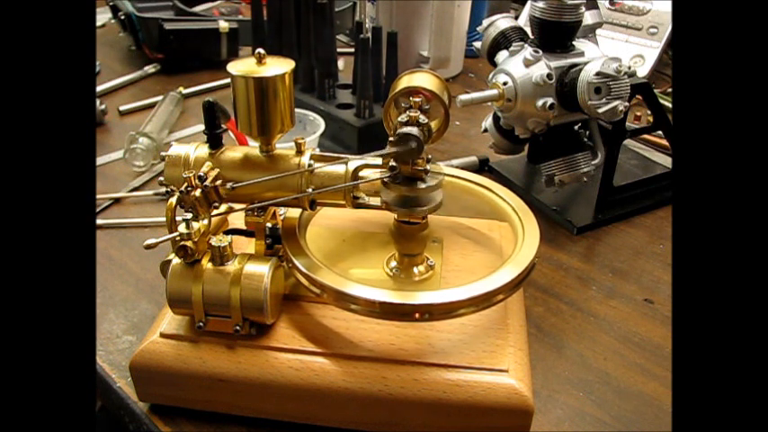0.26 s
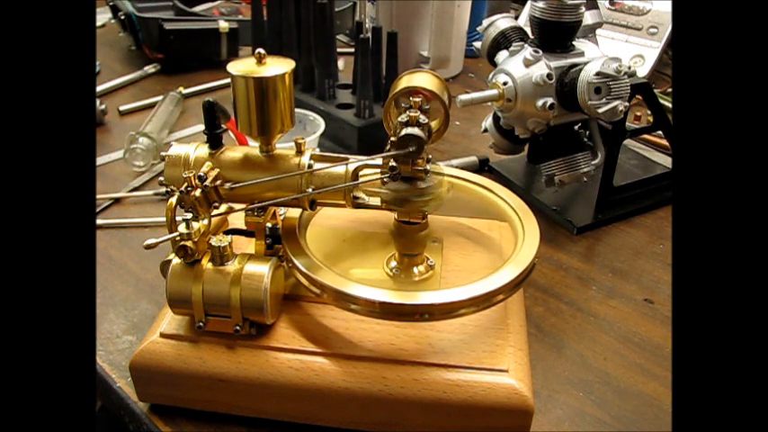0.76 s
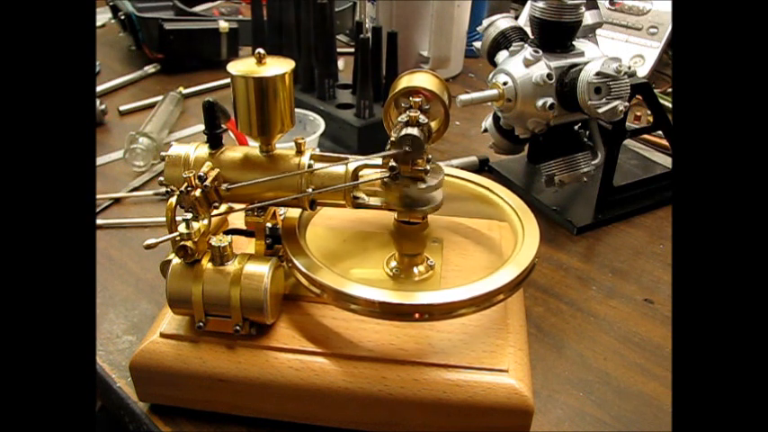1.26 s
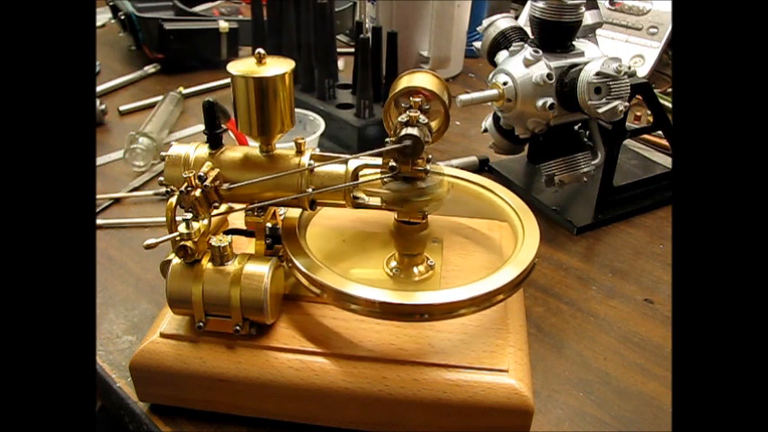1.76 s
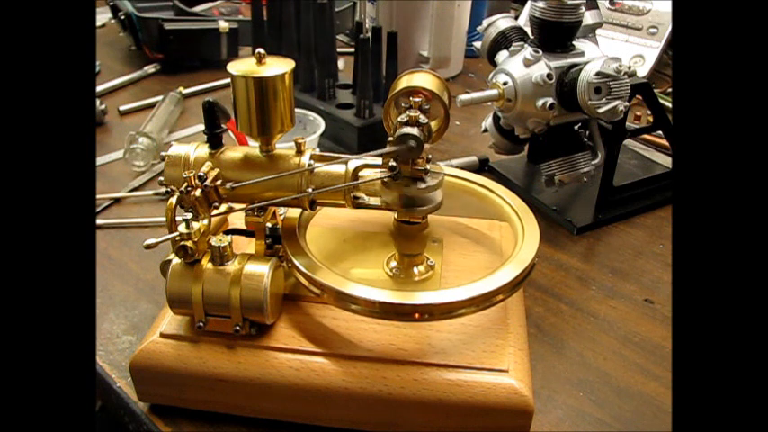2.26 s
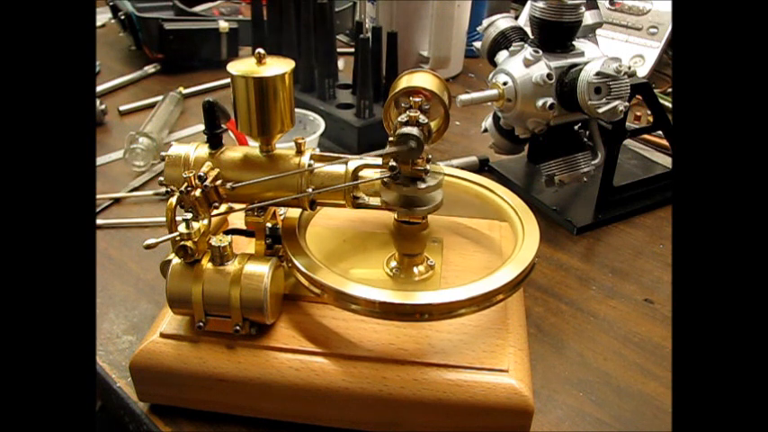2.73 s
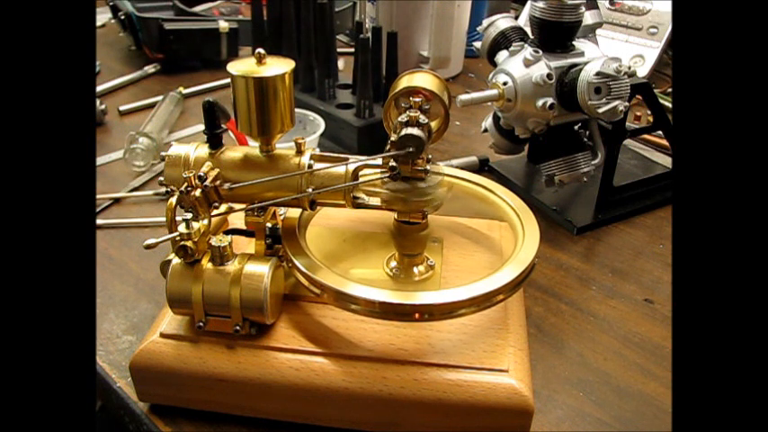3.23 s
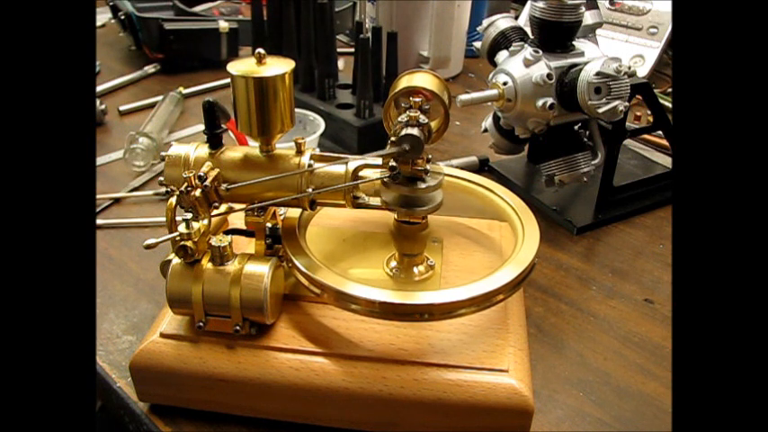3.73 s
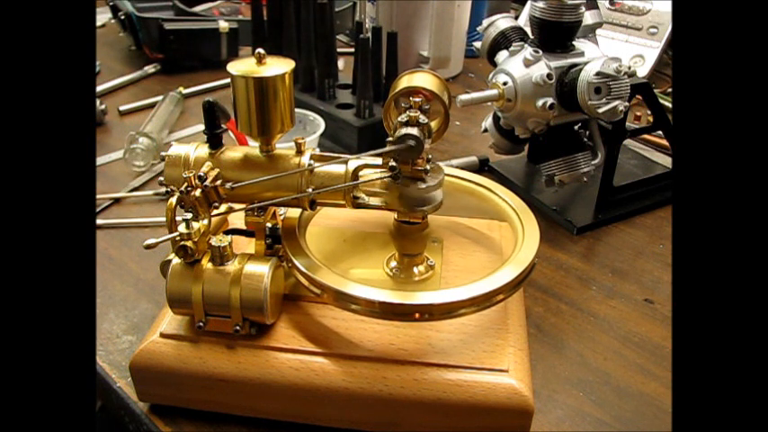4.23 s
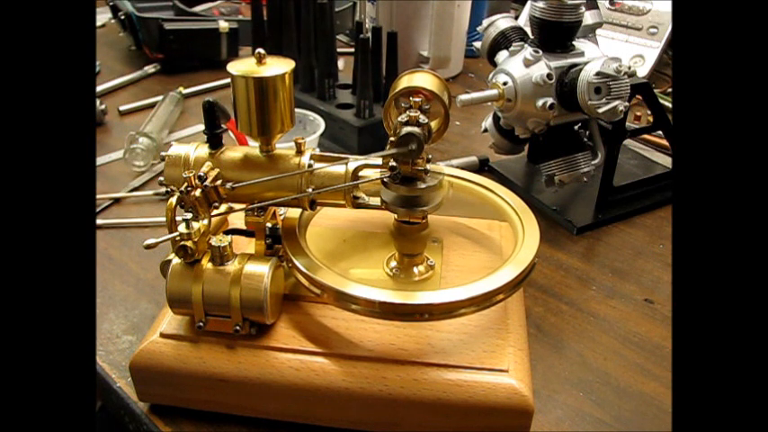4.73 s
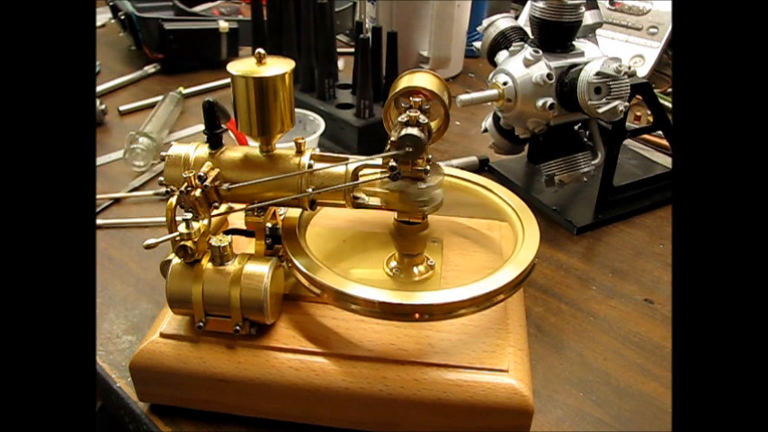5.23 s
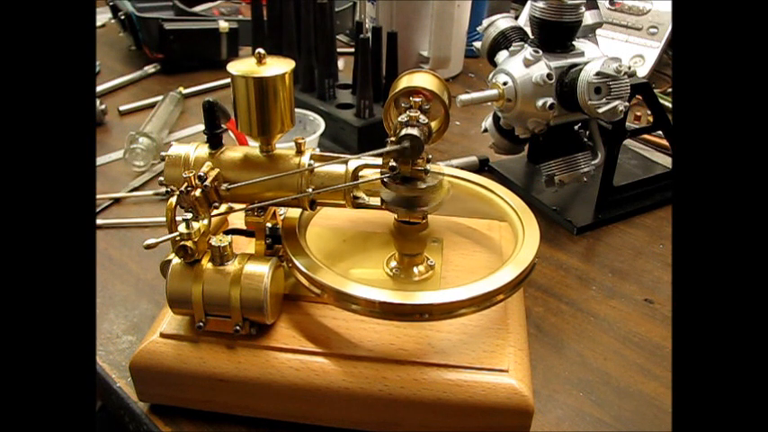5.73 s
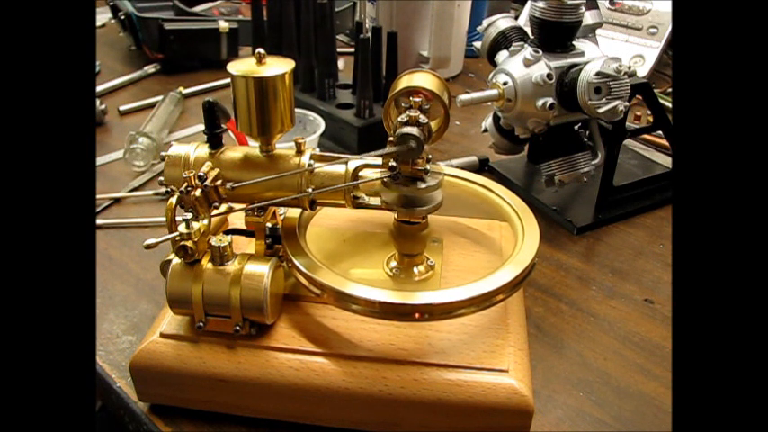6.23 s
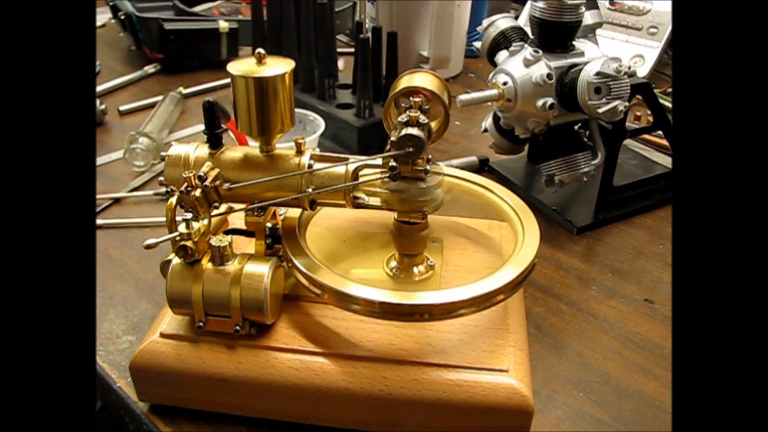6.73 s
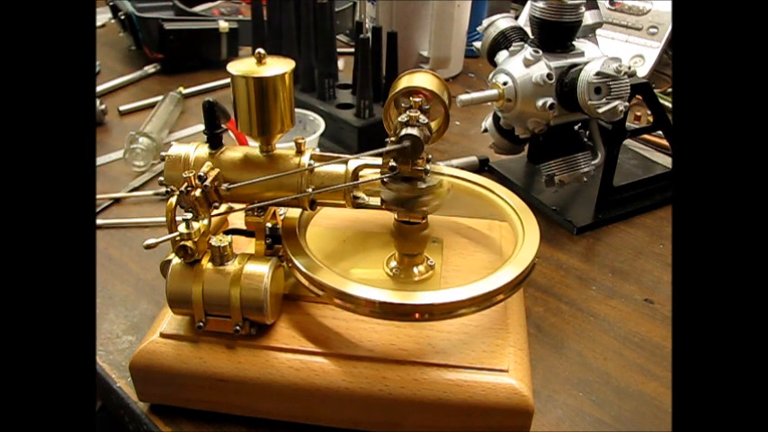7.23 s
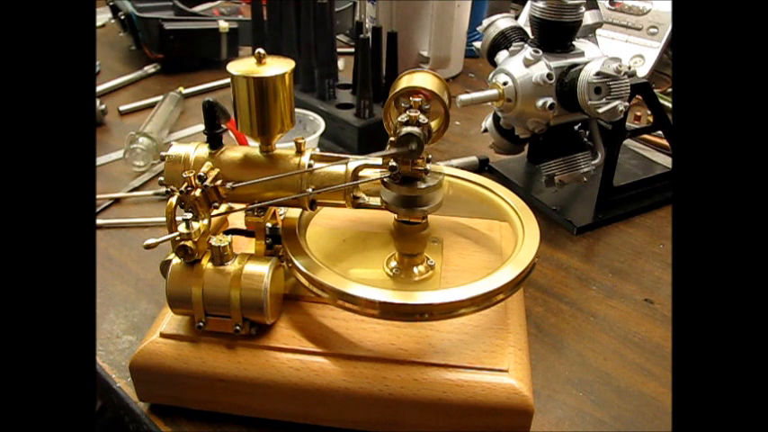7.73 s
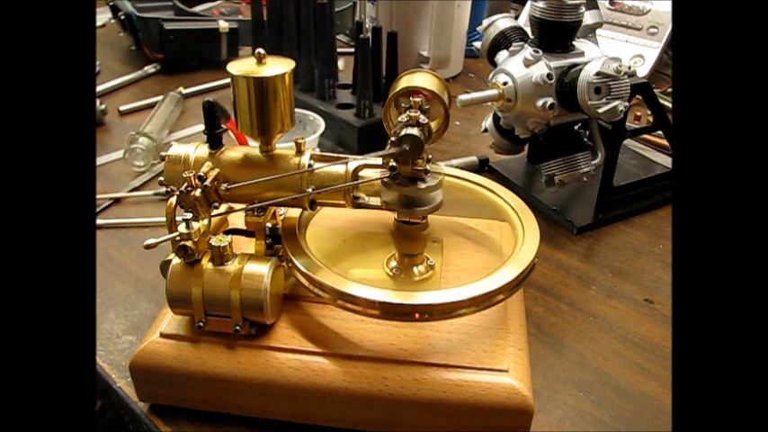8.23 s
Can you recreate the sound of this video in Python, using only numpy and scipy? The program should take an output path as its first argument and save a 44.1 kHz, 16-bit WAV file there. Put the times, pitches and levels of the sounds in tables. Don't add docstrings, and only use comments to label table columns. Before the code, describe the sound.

Close up on a bench, a model brass engine fires with sharp snapping pops, roughly two to three a second, slightly irregular. After each bang the flywheel coasts through one or two much weaker puffs while metal clicks, gears chatter and air hisses in. Early firing is quicker; later gaps lengthen. The shop adds short reflections and a little room ring; no other activity.

```python
import sys
import numpy as np
from scipy import signal
from scipy.fft import rfft, irfft, next_fast_len
from scipy.io import wavfile

SR = 44100
rng = np.random.default_rng(int(sys.argv[2]) if len(sys.argv) > 2 else 0)


def rack_gain(trim_db):
    fader = np.asarray(trim_db, float)
    return 10 ** (fader / 20)


def inscribe(sig):
    pcm = np.round(np.clip(np.atleast_2d(sig).T, -1, 1) * 32767)
    wavfile.write(sys.argv[1], SR, pcm.astype(np.int16))


N = 373968
CYCLE_S = .15

# t/s, thump level/dB, pipe note level/dB, whistle level/dB, top hiss level/dB
FIRINGS = [(0.0739, -16.5, -16.5, -19, -27), (0.3749, -15.5, -20, -22, -27),
           (0.6957, -14.5, -16.5, -20.5, -21.5), (0.9953, -14.5, -14.5, -16, -25),
           (1.3113, -16.5, -14.5, -18.5, -22.5), (1.619, -17.5, -14.5, -19.5, -26.5),
           (2.0855, -15, -22, -13, -26), (2.3809, -16.5, -22.5, -26.5, -26),
           (2.692, -15.5, -18, -20.5, -25.5), (3.0, -14.5, -25, -15.5, -27.5),
           (3.471, -13, -21.5, -17, -23), (3.7609, -14, -15.5, -15, -21), (4.054, -15, -17.5, -14, -25),
           (4.5302, -17, -19.5, -18, -26), (4.995, -18, -15, -13.5, -25.2), (5.452, -17, -17, -16.5, -23.5),
           (5.9053, -18.5, -13.5, -17.5, -27.5), (6.1939, -17.5, -14, -20.5, -26.5),
           (6.653, -17, -18, -15.5, -24), (7.101, -20.5, -14, -19.5, -24), (7.5433, -18.5, -15, -14, -26.5),
           (7.9798, -17, -14.5, -14.5, -27), (8.4207, -16.5, -17.5, -18.5, -26)]
COAST_SHARES = [
    [.4822],
    [.3101, .6464],
]
# thump level/dB, pipe note level/dB, whistle level/dB, top hiss level/dB
MISS_LEVELS = [
    (-27, -29, -31, -46),
    (-26.5, -28, -30.5, -47),
]
# f/Hz, level/dB, t60/s
BLAST_MODES = [(1046, 12, .021), (673, -6, .1), (797, 6.3, .032), (2393, 12, .004)]
# f/Hz, level/dB, t60/s
GULP_MODES = [(1121, 12, .011), (293, -12, .08), (665, -4.5, .06), (805, 2.4, .04), (1820, 3.3, .007),
              (5150, -6, .008)]
# f/Hz, level/dB, t60/s
PIPE_WALL = (1152, 6, 0.022)
# f/Hz, level/dB, t60/s
PLINTH_MODES = [(73, -20, 0.089), (131.4, -20, 0.22), (197.4, -20, 0.11), (275, -34, 0.2),
                (403, -12.5, 0.039), (589, -56, 0.092)]
# f/Hz, width/Hz, level/dB
TEAR_BANDS = [(1735, 700, -2), (2056, 590, 3), (2880, 4000, -3)]
# f/Hz, width/Hz, level/dB
WHISTLE_BANDS = [(5150, 200, 0), (4000, 1200, -19)]
# f/Hz, width/Hz, level/dB
JET_BANDS = [(9360, 190, 6.5), (11770, 230, 3), (15600, 420, -6), (10040, 3700, 1), (7040, 1600, -35)]
# f/Hz, width/Hz, level/dB
CHUFF_BANDS = [(217, 280, -13), (620, 100, -3.5), (1200, 520, -9.5), (1850, 350, -7)]
# share of cycle from valve opening, level/dB
FLOW_CURVE = [(0, -15.5), (.1, -18.5), (.27, -24.5), (.36, -37), (1, -44)]

# f/Hz, t60/s, level/dB under lash and rattle, level/dB under rocker, level/dB under seat
FRAME_MODES = [(195.3, 0.066, -26, -3.5, -16.5), (753, 0.047, -16.5, -20, -24),
               (987, 0.048, -9.5, -24, -11), (1436, 0.02, -13.5, -43, -35), (1936, 0.013, -15.5, -9, -5),
               (2835, 0.016, -16.5, -7.5, -16), (3343, 0.022, -14.5, -31, -35),
               (3650, 0.0066, -4.5, 3, -33), (4820, 0.0067, -5, 4, 2), (5370, 0.01, -15, -24, -22),
               (5460, 0.0043, -12.5, -5, 1), (7320, 0.02, -20.5, -7, -8), (10700, 0.0077, -17, -25, -8),
               (11230, 0.0048, -15, -26, -3.5)]
# f/Hz, width/Hz, then the three levels/dB as in FRAME_MODES
CRACK_BANDS = [(2900, 3500, -4.5, -22, 5.7), (7100, 4100, -1.5, 5, 14), (14000, 7400, -9, 3, 3.7)]
# t/s, level/dB
GEAR_SLACK = [(0.0, -44), (3.99, -43), (4.13, -46), (7.93, -46), (8.48, -45.5)]
# share of cycle from valve opening, level/dB
RATTLE_CURVE = [(0, -38), (.1, -52), (.2, -51.5), (.44, -49), (.522, -43), (.62, -52), (.75, -49),
                (.9, -59), (1, -42.5)]
# level/dB in a fired cycle, a first miss, a second miss,
# scatter/dB, share of the slack's swing
STEM_RULE = (-50.5, -45.5, -38.5, 1.9, 0.4)
CLICK_RULE = (-42, -41, -36, 0.86, 0)
ROCKER_RULE = (-54, -32.5, -31.5, 1.3, 0.5)
KNOCK_RULE = (-48.5, -43, -44.5, 3, 1.25)
LASH_RULES = [
    (-42, -45, -58, 1.6, 0.3),
    (-41.5, -43, -40, 1.2, 2),
    (-44, -41.5, -44, 2, 2.8),
    (-47, -43, -44, 1.2, 1.5),
    (-51, -48, -43, 3.3, 1.5),
    (-58, -56, -46, 1.8, 0.97),
]
LASH_SHARES = (.5, .666, .726, .78, .832, .882)
SEAT_SHARES = (.227, .236, .243)
# t/s, added stem ring level/dB, added click level/dB
ODD_LANDINGS = [(.57, 5, 4.5), (.73, 8, 4), (.88, 5, 2.5), (1.19, -1, -7), (1.5, -9, 2), (1.8, 1, -6),
                (3.18, -12, -1), (3.34, 4.5, 4), (3.5, 5, 2), (3.65, 4, 3.5), (4.24, 6, 0), (4.4, -2, -17),
                (5.17, -12, -2), (5.63, -9, -1), (6.37, 5.5, 6.5), (7.27, 0, -1), (7.71, -5, 5.5),
                (8.15, 5, 2)]

# f/Hz, level/dB per Hz
INTAKE_SPECTRUM = [(1800, -40), (3500, -14), (5500, -7), (6600, 0), (7500, -4), (8300, -9), (10500, -6),
                   (12500, -10), (15800, -9)]
# share of cycle from valve opening, level/dB
SUCK_CURVE = [(0, -54), (.14, -44), (.21, -52), (.27, -42), (.36, -32.5), (.52, -44), (.7, -70), (1, -58)]
SUCK_LEVELS = (1.6, -0.5, 0)

# t/s, signed gain
BENCH_ECHOES = [(0.0023, -0.18), (0.0029, -0.25), (0.0034, 0.29), (0.0043, 0.14), (0.0048, -0.27),
                (0.0062, -0.27), (0.0067, 0.13), (0.0092, 0.12), (0.0112, 0.13), (0.0141, 0.17),
                (0.0169, -0.09), (0.0177, -0.14), (0.0199, 0.11), (0.0241, 0.12), (0.0307, -0.11),
                (0.0315, -0.12)]
# f/Hz, width/Hz, level/dB
HUM_BANDS = [(85, 80, -37), (122, 7.6, -42.5), (192, 30, -44)]
# f/Hz, level/dB per Hz
SHOP_SPECTRUM = [(18, -48), (30, -22), (204, 6), (449, -45), (540, -25), (1160, 16), (1670, 13), (4190, -9),
                 (5170, -29), (16000, -8)]
# f/Hz, side minus mid level/dB
SIDE_CURVE = [(60, -27.5), (1000, -19), (2500, -13.5), (5000, -7), (9000, -10.5), (14000, 2)]
# f/Hz, left minus right level/dB
LEAN_CURVE = [(1300, 0), (2400, -4), (4000, -3), (8000, 2), (13000, 1)]


def exhaust(rows, fired, flow_db, cycle):
    s, thump_db, note_db, whistle_db, hiss_db = rows.T
    bang = valve_pulse(rows[fired], BLAST_MODES, sign=-1, soft_s=.00019, wall_db=0)
    pop = valve_pulse(rows[~fired], GULP_MODES, sign=1, soft_s=.000054, wall_db=-4.5)
    pulse = (bang + pop) * rack_gain([[-.3], [.3]])
    tear = burst(clicks(s, rack_gain(thump_db + 14.5)), 0.00014, 0.0014)
    stroke = rack_gain(flow_db - np.where(fired[cycle], 9, 0))
    whistle = gas_rush(s, whistle_db, 19, stroke, cycle, WHISTLE_BANDS)
    hiss = gas_rush(s, hiss_db, 17, stroke, cycle, JET_BANDS)
    chuff = burst(clicks(s, rack_gain(thump_db - 6 + 1 * ~fired)), 0.017, 0.026)
    return blown(tear, TEAR_BANDS) + pulse + whistle + hiss + blown(chuff, CHUFF_BANDS)


def valve_pulse(rows, modes, sign, soft_s, wall_db):
    s, thump_db, note_db = rows[:, 0] - .00007, rows[:, 1], rows[:, 2]
    thump = clicks(s, sign * rack_gain(thump_db))
    note = clicks(s, sign * rack_gain(note_db))
    note_hz, gain_db, note_t60 = modes[0]
    out = rack_gain(gain_db) * ring(note, note_hz, note_t60)
    wall_hz, gain_db, wall_t60 = PIPE_WALL
    out = out + rack_gain(wall_db + gain_db) * ring(note, wall_hz, wall_t60)
    for hz, db, t60 in modes[1:] + PLINTH_MODES:
        out = out + rack_gain(db) * ring(thump, hz, t60)
    r = np.exp(-1 / (soft_s * SR))
    return signal.lfilter([1 - r], [1, -r], out)


def gas_rush(s, level_db, gain_db, stroke, cycle, bands):
    spurt = burst(clicks(s, rack_gain(level_db)), 0.00044, 0.0015)
    envelope = rack_gain(gain_db) * (spurt + stroke * rack_gain(level_db[cycle]))
    return even(blown(envelope, bands), envelope, cycle)


def openings():
    rows, misses = [], []
    for now, then in zip(FIRINGS, FIRINGS[1:]):
        wait = then[0] - now[0]
        shares = COAST_SHARES[round(wait / CYCLE_S) - 2]
        rows.append(now)
        rows += [(now[0] + share * wait, *db) for share, db in zip(shares, MISS_LEVELS)]
        misses += range(len(shares) + 1)
    rows = np.array(rows + FIRINGS[-1:])
    misses = np.array(misses + [0])
    missed = misses > 0
    scatter_db, follows = 1.62, 0.87
    rows[:, 1:] += missed[:, None] * scatter_db * rng.standard_normal((len(rows), 4))
    rows[:, 1] += missed * follows * slack(rows[:, 0])
    return rows, misses


def crank(s):
    marks = np.r_[s[0] - CYCLE_S, s, s[-1] + CYCLE_S]
    turns = np.interp(np.arange(N) / SR, marks, np.arange(len(marks)))
    return turns % 1, np.clip(turns.astype(int) - 1, 0, len(s) - 1)


def frame(s, misses, rattle_db):
    start, length, kind = s[:-1], np.diff(s), misses[:-1]
    seat = start + length * np.take(SEAT_SHARES, kind)
    landing_db = np.zeros((len(seat), 2))
    for when, *db in ODD_LANDINGS:
        landing_db[np.argmin(abs(seat - when))] = db
    loose = gear_play(start, length, kind, rattle_db)
    rocker_lead_s = .0112
    taps = burst(rack_gain(-11) * contacts(s - rocker_lead_s, misses, ROCKER_RULE), 0.00028, 0.00092)
    drop = burst(rack_gain(-4.5) * contacts(seat, kind, CLICK_RULE, landing_db[:, 1]), .0001, 0.0018)
    brass = brass_ring(loose, taps, drop)
    landing = contacts(seat, kind, STEM_RULE, landing_db[:, 0])
    stem = ring(burst(rack_gain(4.5) * landing, .00003, .00006), 2200, .045)
    return brass + stem * rack_gain([[-2.5], [2.5]]) + piston_knock(start, length, kind)


def gear_play(start, length, kind, rattle_db):
    lash = 0
    for at, rule in zip(LASH_SHARES, LASH_RULES):
        lash = lash + contacts(start + at * length, kind, rule)
    grains_per_s = 2500
    heights = rack_gain(3.18 * np.minimum(rng.exponential(1, N), 5))
    grains = (rng.random(N) < grains_per_s / SR) * heights
    return rack_gain(rattle_db + 1) * grains + burst(rack_gain(-3.5) * lash, 0.000067, 0.0011)


def brass_ring(loose, taps, drop):
    cracks = [(hz, 2.6 / width, *db) for hz, width, *db in CRACK_BANDS]
    noise, out = rng.standard_normal((2, N + 4000)), 0
    for k, (hz, t60, loose_db, tap_db, seat_db) in enumerate(FRAME_MODES + cracks):
        force = rack_gain(loose_db) * loose + rack_gain(tap_db) * taps + rack_gain(seat_db) * drop
        rough = noise[:, 97 * k:97 * k + N]
        out = out + spread(ring(force * rough, hz, t60), hz)
    return out


def piston_knock(start, length, kind):
    knock = burst(contacts(start + .6 * length, kind, KNOCK_RULE), 0.009, 0.00038)
    return ring(knock, 193.7, 0.073)


def contacts(s, misses, rule, extra_db=0):
    *db, scatter_db, follows = rule
    jitter_s = .0006
    chance = rng.standard_normal((len(s), 2))
    level_db = np.take(db, misses) + extra_db + follows * slack(s) + scatter_db * chance[:, 1]
    return clicks(s + jitter_s * chance[:, 0], rack_gain(level_db))


def slack(s):
    return along(GEAR_SLACK, s) - np.mean(GEAR_SLACK, axis=0)[1]


def intake(misses, share, cycle):
    gulp_db = np.take(SUCK_LEVELS, misses) + 0.53 * rng.standard_normal(len(misses))
    return rack_gain(along(SUCK_CURVE, share) + gulp_db[cycle]) * coloured(INTAKE_SPECTRUM)


def shop(x):
    t60_s, wall_cut_hz, echo_cut_hz, room_db = 0.46, 8200, 1400, -24
    size = next_fast_len(N + SR)
    hz = np.fft.rfftfreq(size, 1 / SR)
    s, gain = np.transpose(BENCH_ECHOES)
    skew = .000045 * (-1) ** np.arange(len(s))
    taps = [clicks(s + skew, gain), clicks(s - skew, gain)]
    echoes = 1 + rfft(taps, size) / (1 + 1j * hz / echo_cut_hz)
    dull = 1 / (1 + 1j * hz / wall_cut_hz)
    walls = np.zeros((2, len(hz)), complex)
    for k, lag in enumerate(rng.uniform(.012, 0.033, 16)):
        loop = rack_gain(-60 * lag / t60_s) * dull * np.exp(-2j * np.pi * hz * lag)
        walls[k % 2] += (-1) ** (k // 2) * loop / (1 - loop)
    alike = walls.mean(axis=0) + 0.25 * walls
    return irfft(rfft(x, size) * (echoes + rack_gain(room_db) * alike), size)[:, :N]


def background():
    return rack_gain(-53) * coloured(SHOP_SPECTRUM) + blown(0.95, HUM_BANDS)


def blown(envelope, resonances):
    out, gas = 0, envelope * rng.standard_normal((2, N))
    for k, (hz, width, db) in enumerate(resonances):
        tone = spread(ring(gas, hz, np.log(9) / width), hz)
        out = out + (-1) ** k * rack_gain(db) * tone * np.sqrt(width / SR)
    return out


def even(sound, envelope, cycle):
    ratio = np.bincount(cycle, envelope ** 2) / np.bincount(cycle, sound.mean(axis=0) ** 2)
    return sound * np.sqrt(ratio / np.median(ratio))[cycle]


def coloured(spectrum):
    size = next_fast_len(N)
    hz = np.maximum(np.fft.rfftfreq(size, 1 / SR), 1)
    shape = rack_gain(at_hz([(0.76, -102)] + list(spectrum), hz))
    mid_side = rfft(rng.standard_normal((2, size))) * shape
    return rms_one(irfft(spread(mid_side, hz), size)[:, :N])


def spread(mid_side, hz):
    pair = mid_side[0] + rack_gain(at_hz(SIDE_CURVE, hz)) * mid_side[1] * [[1], [-1]]
    return pair * rack_gain(at_hz(LEAN_CURVE, hz) * np.array([[.5], [-.5]]))


def clicks(times, sizes):
    out = np.full(N, 1e-18)
    out[np.clip(np.round(np.asarray(times) * SR).astype(int), 0, N - 1)] = sizes
    return out


def burst(x, rise_s, fall_s):
    up, down = np.exp(-1 / (rise_s * SR)), np.exp(-1 / (fall_s * SR))
    return signal.lfilter([1 - up], np.convolve([1, -up], [1, -down]), x)


def ring(x, hz, t60):
    r, w = rack_gain(-60 / (t60 * SR)), 2 * np.pi * hz / SR
    return signal.lfilter([0, np.sin(w)], [1, -2 * r * np.cos(w), r * r], x)


def rms_one(x):
    return x / np.sqrt(np.mean(x ** 2) + 1e-20)


def along(points, at):
    return np.interp(at, *np.transpose(points))


def at_hz(points, hz):
    f, db = np.transpose(points)
    return np.interp(np.log(hz), np.log(f), db)


def scene():
    rows, misses = openings()
    s = rows[:, 0]
    share, cycle = crank(s)
    engine = exhaust(rows, misses == 0, along(FLOW_CURVE, share), cycle)
    engine = engine + frame(s, misses, along(RATTLE_CURVE, share) + slack(np.arange(N) / SR))
    engine = engine + intake(misses, share, cycle)
    return shop(engine) + background()


def roll_off(x):
    return signal.sosfilt(signal.butter(12, 16970, fs=SR, output="sos"), x)


def record(dry):
    x = np.stack([dry[0], np.roll(dry[1], 1)])
    x = signal.sosfilt(signal.butter(2, 109.6, "high", fs=SR, output="sos"), x)
    low_band = signal.butter(2, [20, 45], "band", fs=SR, output="sos")
    rumble = signal.sosfilt(low_band, rng.standard_normal((2, N)))
    x = 1.16 * np.tanh(x / 1.578) + rack_gain(-68) * rms_one(rumble)
    x = signal.sosfilt(signal.cheby2(10, 30, 16200, fs=SR, output="sos"), x)
    return roll_off(x)


dry = scene()
out = record(dry)
inscribe(out)
```